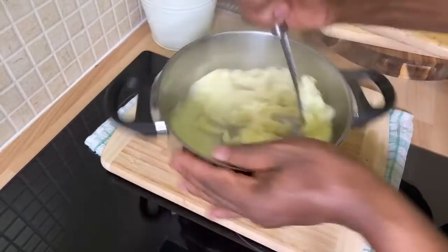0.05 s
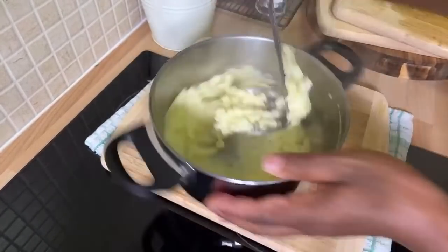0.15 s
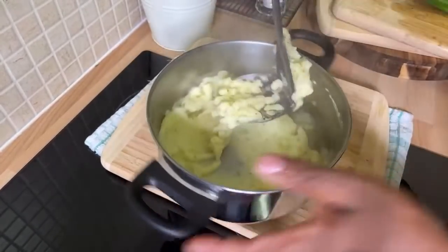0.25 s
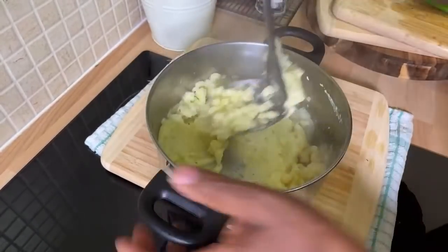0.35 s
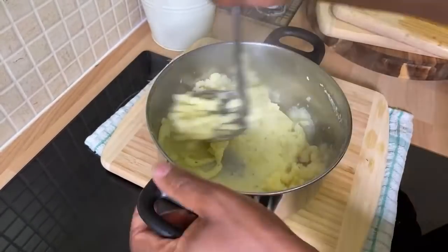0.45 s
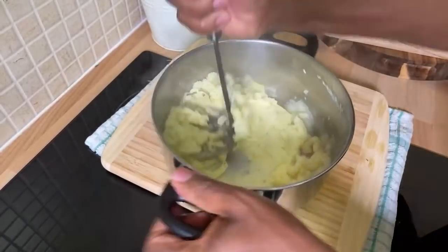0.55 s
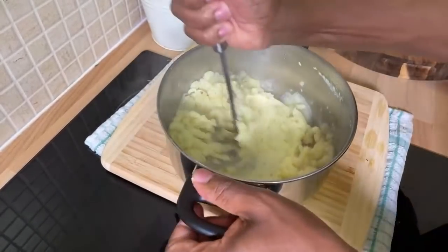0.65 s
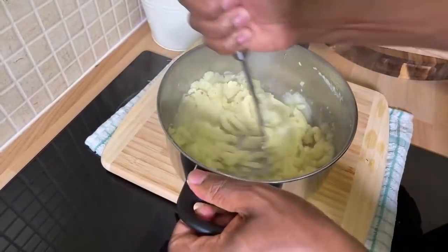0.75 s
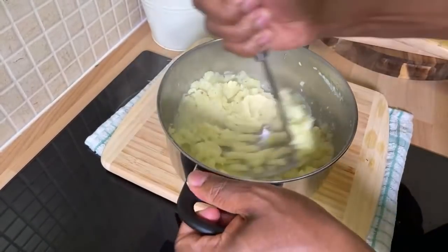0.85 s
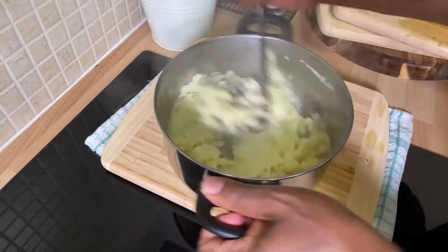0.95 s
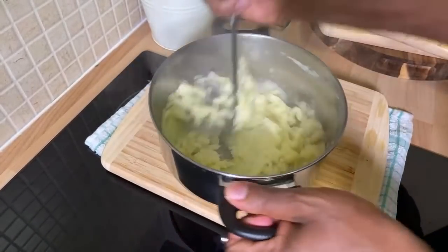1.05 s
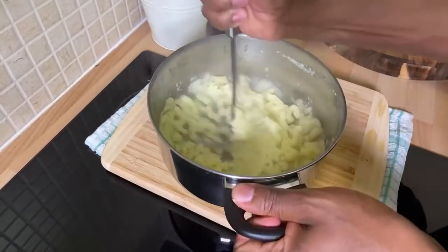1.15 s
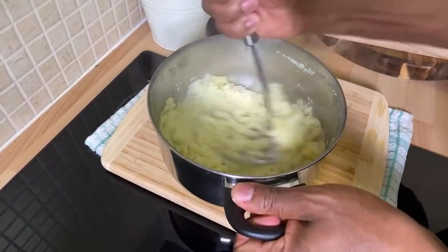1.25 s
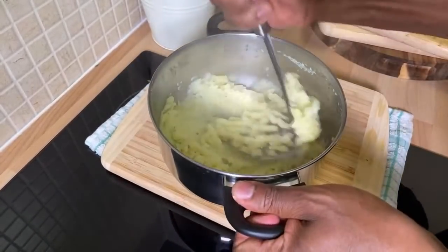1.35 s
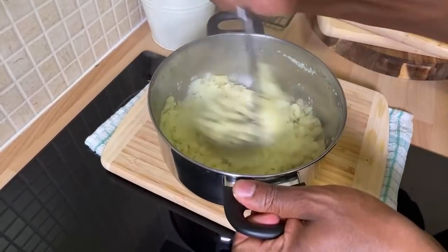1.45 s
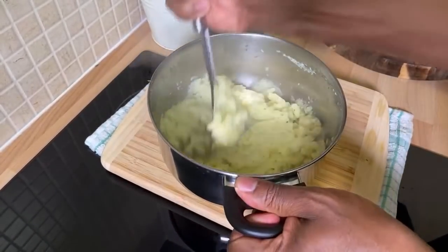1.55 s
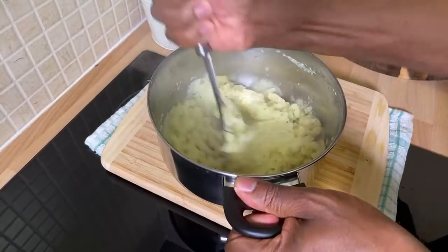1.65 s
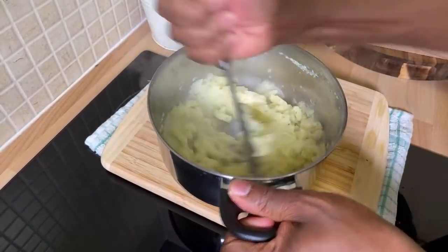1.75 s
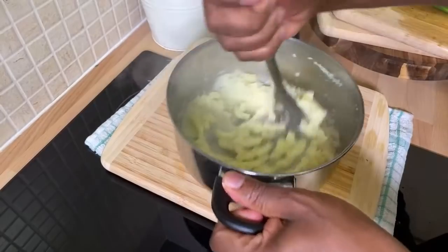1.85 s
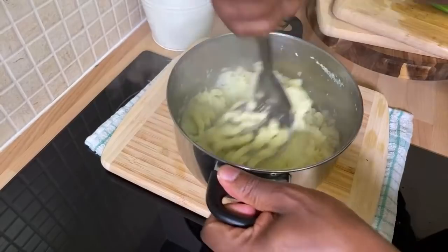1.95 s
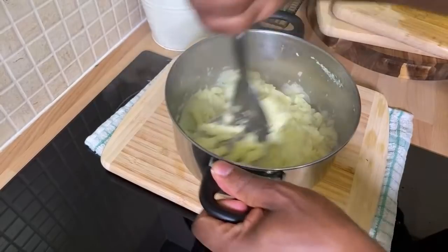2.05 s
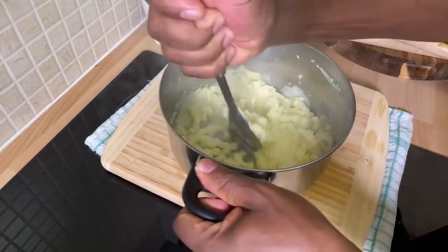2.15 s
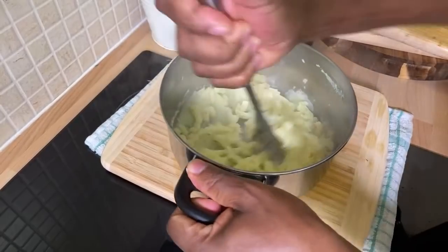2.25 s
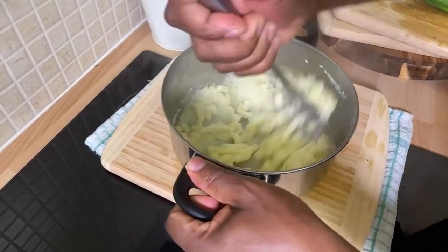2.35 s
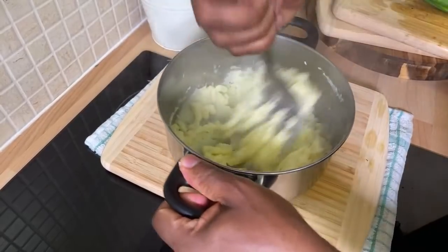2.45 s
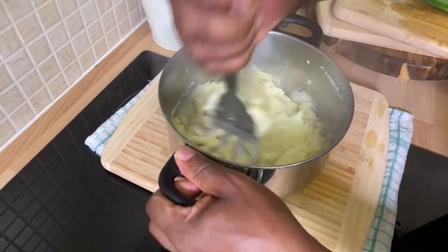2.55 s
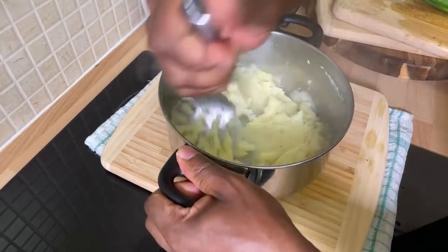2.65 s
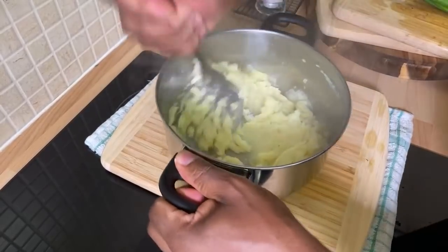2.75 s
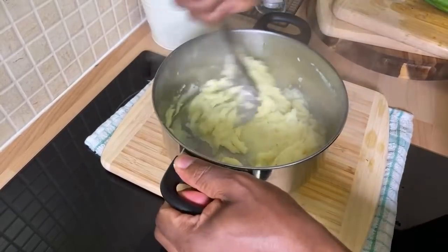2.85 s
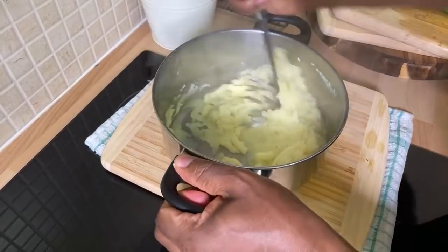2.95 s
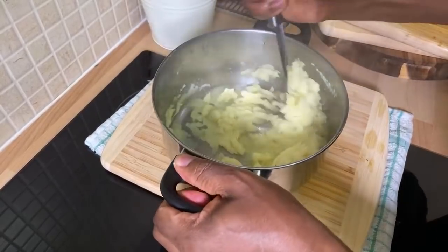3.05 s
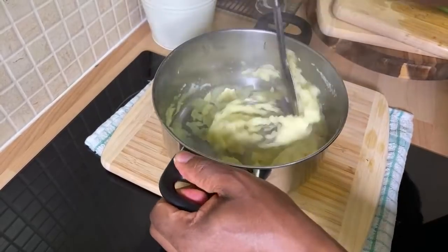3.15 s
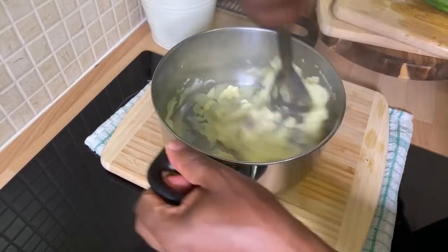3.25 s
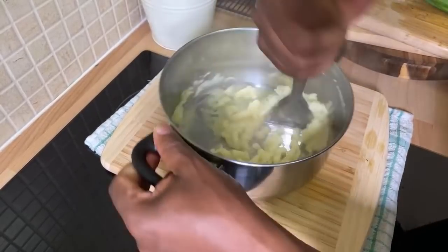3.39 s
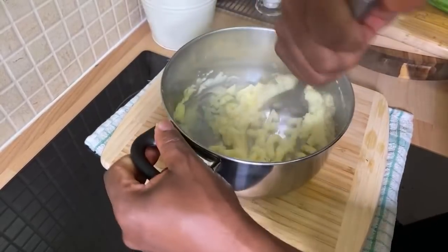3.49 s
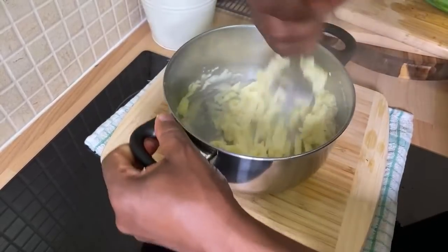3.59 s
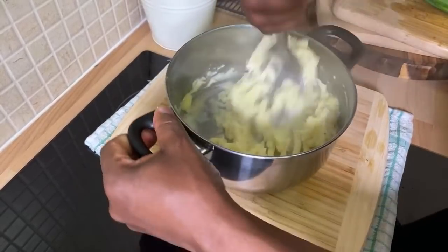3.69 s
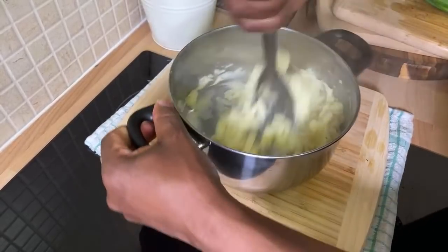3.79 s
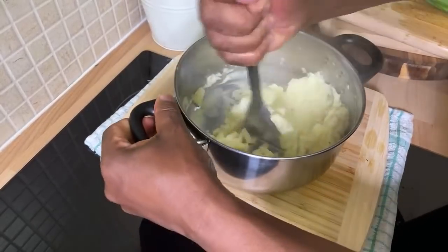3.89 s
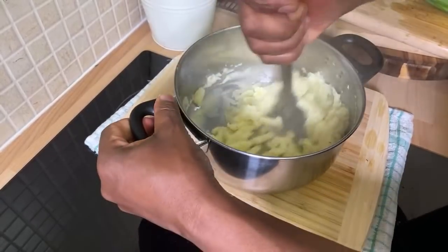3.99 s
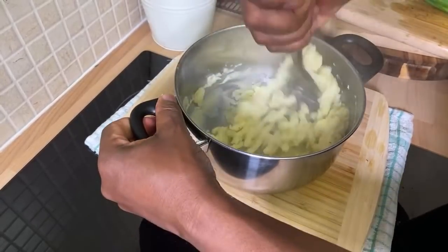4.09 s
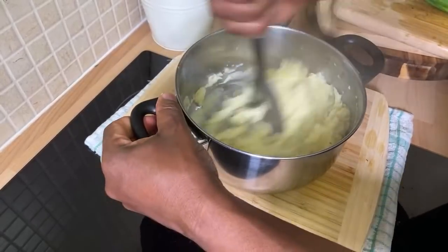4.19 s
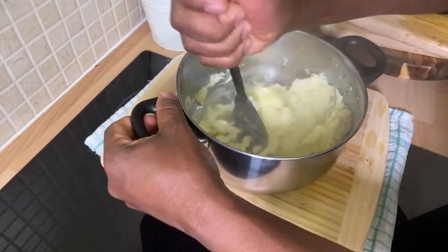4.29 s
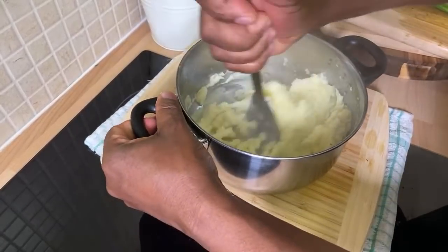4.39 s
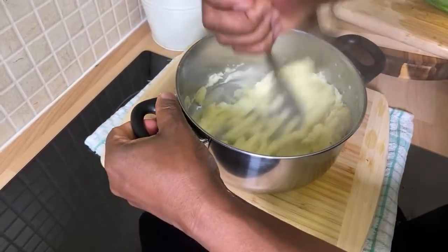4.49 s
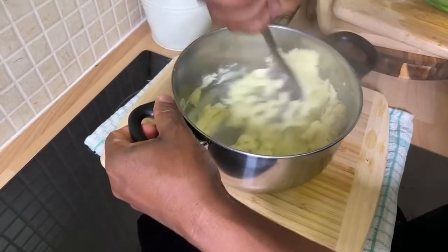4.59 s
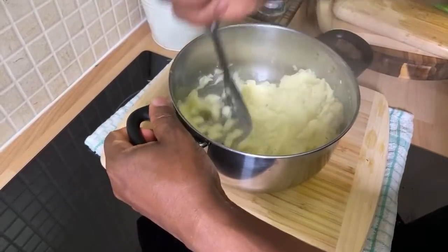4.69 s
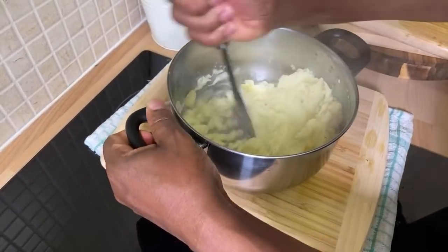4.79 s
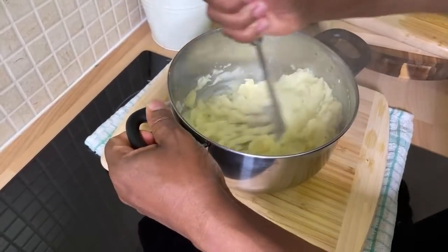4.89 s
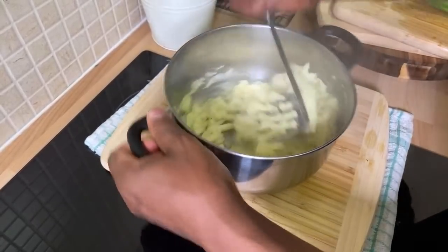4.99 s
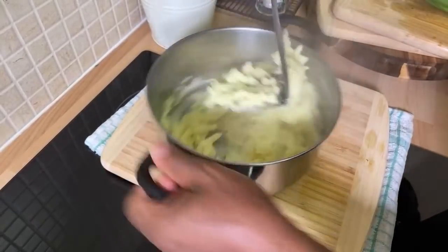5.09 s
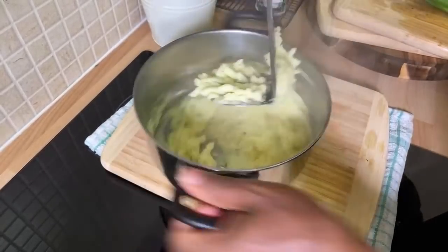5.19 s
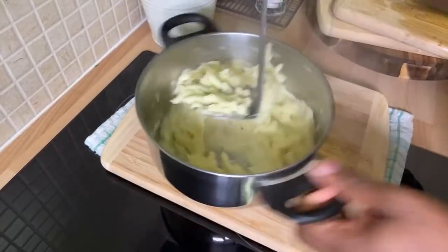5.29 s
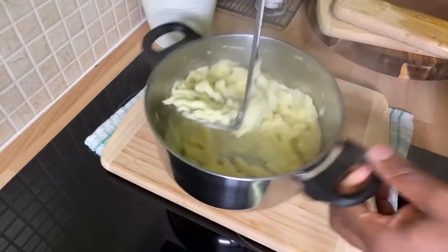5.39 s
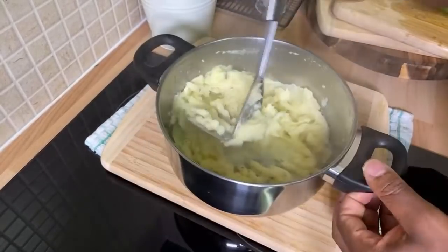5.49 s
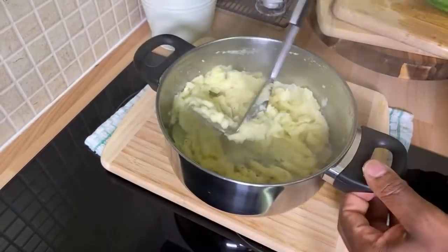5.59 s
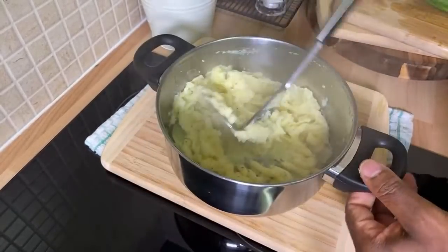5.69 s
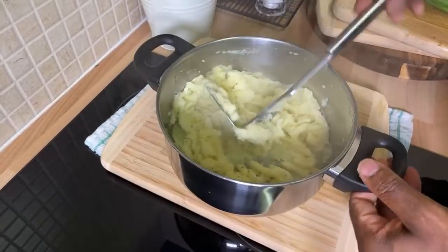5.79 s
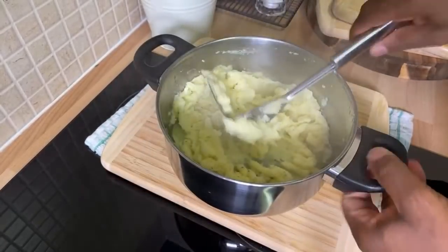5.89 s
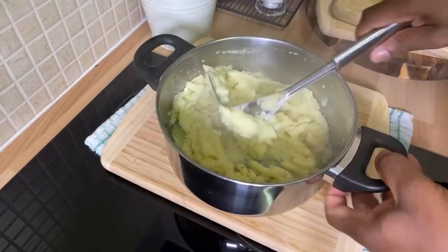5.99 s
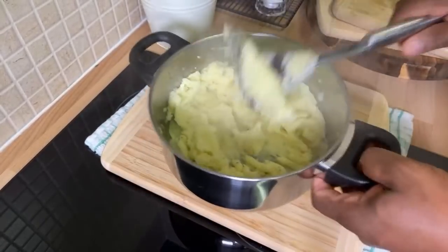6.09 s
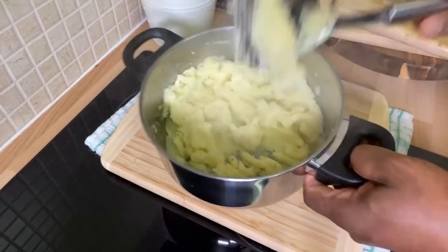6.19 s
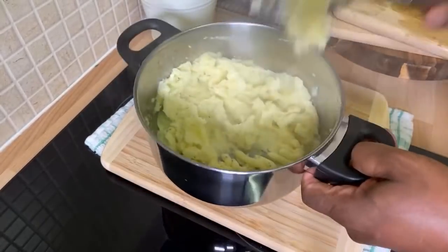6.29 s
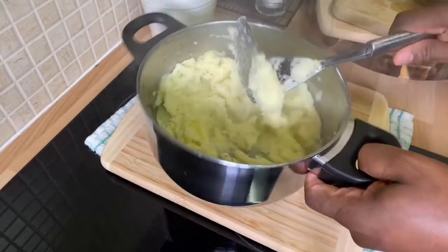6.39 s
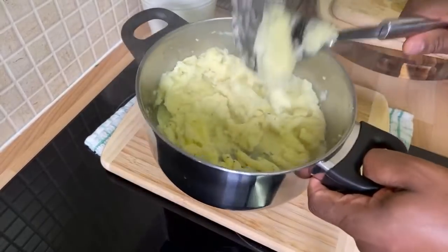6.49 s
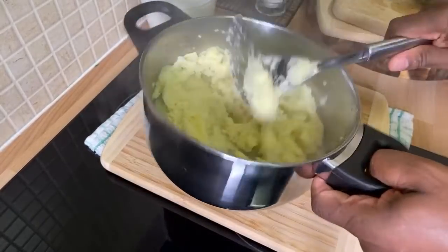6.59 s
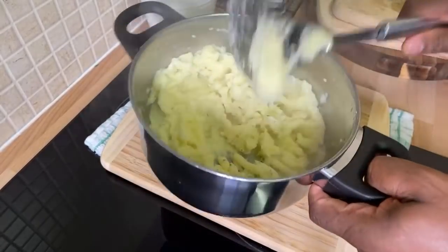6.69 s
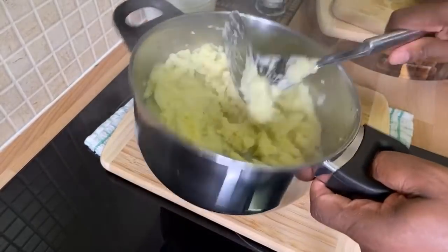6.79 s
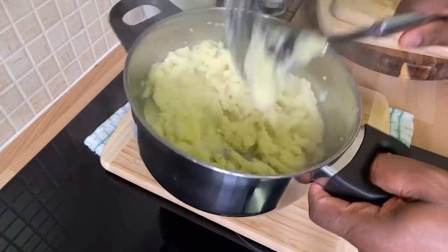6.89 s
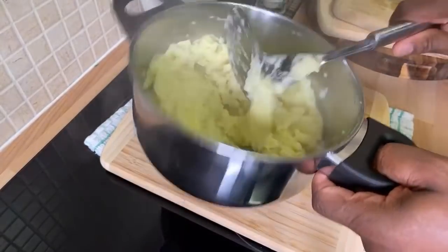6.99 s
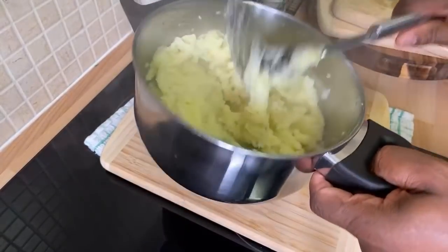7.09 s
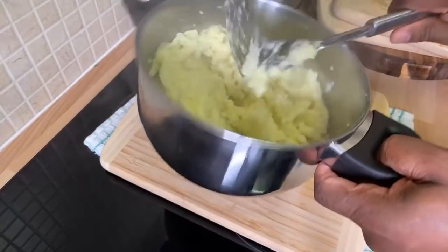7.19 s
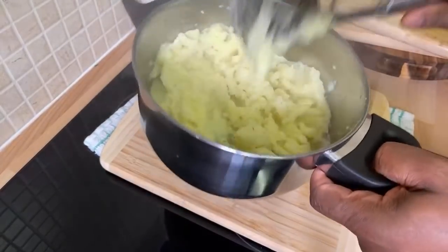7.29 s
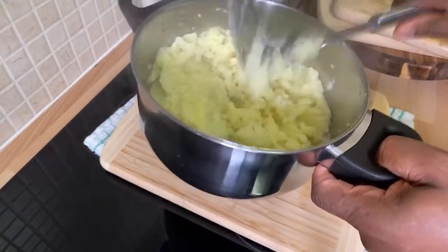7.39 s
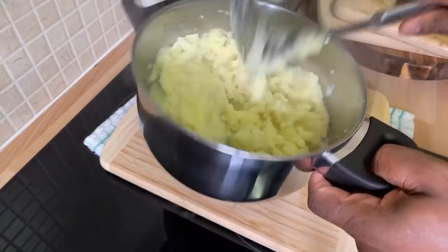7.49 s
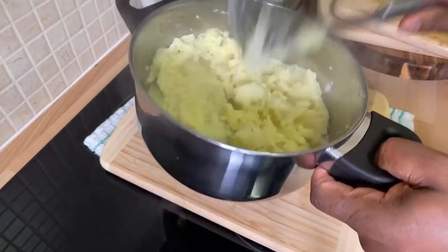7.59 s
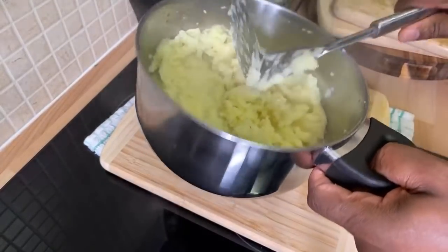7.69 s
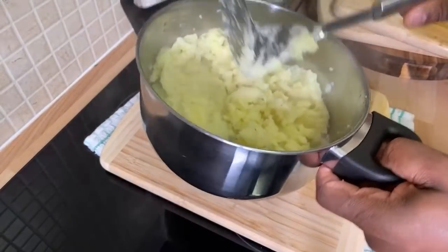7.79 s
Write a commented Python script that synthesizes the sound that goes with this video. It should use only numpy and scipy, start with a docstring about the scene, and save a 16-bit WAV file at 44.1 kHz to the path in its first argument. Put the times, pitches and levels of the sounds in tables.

```python
"""A metal masher knocks on the bottom of a steel pot of boiled potato that stands on a wooden board,
then falls against the rim and is rapped on it. Each blow excites damped modes of pot and masher, a
filtered noise crack and a worktop boom. In between, random grains make the mash hiss, the pot rub and
the worktop rumble; the pot bumps, small bright rattles tick and faint tones squeak. Decaying noise
gives the reflections of a small tiled kitchen; coloured noise is the still air."""
import sys
import numpy as np
from scipy import signal
from scipy.io import wavfile

SR = 44100
rng = np.random.default_rng(int(sys.argv[2]) if len(sys.argv) > 2 else 0)


def wav_record(signal):
    """Record a signal, one row per channel, as 16-bit PCM in the file named by sys.argv[1]."""
    frames = np.transpose(np.atleast_2d(signal))
    bounded = np.clip(frames, -1, 1)
    # unit amplitude maps onto the largest positive 16-bit level
    quanta = np.round(bounded * 32767).astype(np.int16)
    wavfile.write(sys.argv[1], SR, quanta)


N = 346185
TIME = np.arange(N) / SR   # [s]
EDGES = 40 * 2 ** np.arange(0, 9, 1 / 3)   # third-octave band edges [Hz]
CENTRES = np.sqrt(EDGES[1:] * EDGES[:-1])


def from_db(db):
    """Decibel law: the amplitude gain of a level."""
    return 10 ** (np.asarray(db) / 20)


def rms_one(x):
    """Normalisation of mean power: the signal scaled to rms 1."""
    return x / np.sqrt(np.mean(x ** 2) + 1e-20)


def at_hz(points, hz):
    """Logarithmic frequency scale: a table interpolated at a frequency."""
    points = np.array(points)
    return np.interp(np.log(hz), np.log(points[:, 0]), points[:, 1])


def butter(x, hz, kind, order=2):
    """Maximally flat filtering: a Butterworth low, high or band pass."""
    sos = signal.butter(order, hz, kind, fs=SR, output="sos")
    return signal.sosfilt(sos, x + 1e-18)


def coloured(x, spectrum):
    """Spectral shaping: third-octave bands, each with the gain of the spectrum at its centre."""
    out = 0
    for k, hz in enumerate(CENTRES):
        band = butter(x, EDGES[k:k + 2], "band", order=1)
        out = out + from_db(at_hz(spectrum, hz)) * band
    return out


def drift(rate_hz):
    """Low-pass random process: slow noise of rms 1, computed at every 40th sample."""
    r = np.exp(-2 * np.pi * rate_hz * 40 / SR)
    settle = 2000
    noise = rng.standard_normal(N // 40 + 2 + settle)
    slow = signal.lfilter([1], [1, -2 * r, r * r], noise)[settle:]
    return np.interp(np.arange(N) / 40, np.arange(len(slow)), rms_one(slow))


def ring(force, modes, column=2):
    """Modal superposition: damped resonators driven by one force, each at its level in the column."""
    out = 0
    for k, mode in enumerate(modes):
        hz, t60_s = mode[:2]
        r = from_db(-60 / (t60_s * SR))
        w = 2 * np.pi * hz / SR
        resonance = signal.lfilter([0, np.sin(w)], [1, -2 * r * np.cos(w), r * r], force + 1e-18)
        out = out + (-1) ** k * from_db(mode[column]) * resonance   # neighbours in opposite sign
    return out


def pushes(rows, axis, lag_s):
    """Impulse excitation: one click for each row, a little after first touch."""
    out = np.zeros(N)
    rows = np.array(rows)
    at = np.round((rows[:, 0] + lag_s) * SR).astype(int)
    out[at] = from_db(rows[:, axis])
    return out


SPLINTER = 0.28   # exponent by which a few sharp contacts stand out of a rattle


def contacts(rows, axis, rise_s, fall_s):
    """Repeated micro-impacts: each row is a short noise rattle of unit energy times its level."""
    t = np.arange(int(.05 * SR)) / SR
    shape = (1 - np.exp(-t / rise_s)) ** 2 * np.exp(-t / fall_s)
    out = np.zeros(N + len(t))
    for row in rows:
        noise = rng.standard_normal(len(t))
        rattle = shape * noise * np.abs(noise) ** SPLINTER
        at = round((row[0] - rise_s) * SR)
        out[at:at + len(t)] += from_db(row[axis]) * rattle / np.sqrt(np.sum(rattle ** 2))
    return out[:N]


def grains(per_s, spread_db):
    """Poisson process: random clicks of uneven size and either sign."""
    sizes = from_db(spread_db * np.minimum(rng.exponential(1, N), 5))
    signs = rng.choice([-1, 1], N)
    return sizes * signs * (rng.random(N) < per_s / SR)


# spectrum of the still air: (frequency [Hz], relative level per Hz [dB])
AIR = [(24, -36), (40, 11), (115, 12.5), (204, -19.5), (256, 3.5), (646, -17), (1020, -15), (2210, -18.5),
       (14800, -21.5), (16000, -36)]
AIR_DB = -58   # rms level


def still_air():
    """Stationary broadband noise: white noise coloured to a steady spectrum."""
    return from_db(AIR_DB) * rms_one(coloured(rng.standard_normal(N), AIR))


# reverberation of the kitchen: (frequency [Hz], decay time t60 [s])
KITCHEN = [(100, 0.78), (300, 0.18), (800, 0.23), (2000, 0.24), (5000, 0.24), (12000, 0.24)]
MOVED = 0.32   # share of reflected energy that is new at each blow, as pot and arms move


def kitchen(x):
    """Diffuse reverberation: dense reflections off tiles and cupboards die away band by band."""
    t = np.arange(int(.6 * SR)) / SR
    blow_starts = sorted(round((row[0] - .01) * SR) for row in KNOCKS + RAPS + FALLS[:1])
    starts = [0, *blow_starts, N]
    white = rng.standard_normal((len(starts), 2, len(t)))
    white = np.sqrt(1 - MOVED) * white[0] + np.sqrt(MOVED) * white[1:]
    echo = 0
    for k, hz in enumerate(CENTRES):
        band = butter(white[:, k % 2], EDGES[k:k + 2], "band")   # neighbouring bands differ in noise
        echo = echo + band * from_db(-60 * t / at_hz(KITCHEN, hz))
    echo = echo * (1 - np.exp(-t / 0.0023))   # reflections build up
    out = np.zeros(N + len(t))
    for start, end, answer in zip(starts, starts[1:], echo):
        answer = answer / np.sqrt(np.sum(answer ** 2))
        out[start:end + len(t) - 1] += signal.fftconvolve(x[start:end], answer)
    return out[:N]


# faint squeaks: (time [s], frequency [Hz], level [dB])
SQUEAKS = [(.372, 2480, -59), (4.9, 2110, -58), (6.21, 2420, -69)]


def squeaks():
    """Pure tones: short sines under a smooth, flat-topped envelope."""
    out = np.zeros(N)
    for s, hz, db in SQUEAKS:
        envelope = np.exp(-((TIME - s) / 0.018) ** 4)
        out += from_db(db) * envelope * np.sin(2 * np.pi * hz * TIME)
    return out


# modes of worktop and board: (frequency [Hz], decay time t60 [s],
# relative level with the pot standing [dB], relative level with it tilted [dB])
WORKTOP_MODES = [(66.5, 1, -3, -37), (86.3, 0.24, -2.5, -26.5), (116.9, 0.19, 3, 3.5),
                 (167.4, 0.2, -6.5, 5), (196.4, 0.075, 0, 1.5), (252, 0.13, -9.5, -5)]
STANDING, TILTED = 2, 3   # columns


def thumps(rows, pose, level_db):
    """Structure-borne sound: the push goes through the board and sets the worktop booming."""
    push = butter(pushes(rows, axis=2, lag_s=0.00734), 600, "low")
    return from_db(level_db) * ring(push, WORKTOP_MODES, pose)


# the masher is pulled out of the mash and the pot shifts: (release time [s], swell time [s],
# hiss level [dB], pot rubbing level [dB], worktop rumble level [dB])
PULLS = [(0.22, 0.19, -59.5, -57.5, -49), (0.80, 0.038, -56, -54, -57), (1.27, 0.027, -54.5, -76, -45),
         (1.86, 0.12, -60.5, -58, -61), (2.328, 0.075, -53.5, -54, -70), (3.09, 0.12, -59, -78, -66),
         (3.589, 0.055, -55.5, -56, -57), (4.04, 0.054, -55.5, -46.5, -57),
         (4.475, 0.031, -50.5, -52.5, -46), (4.91, 0.045, -54, -54, -66), (5.98, 0.015, -56.5, -55.5, -63)]
SWELL_DB = 8.5   # rise over the swell time, and fall over each fall time below
HISS_FALL_S, RUB_FALL_S, RUMBLE_FALL_S = 0.036, 0.048, 0.046
RUB_LEAD_S, RUMBLE_LEAD_S = 0.037, 0.004   # the pot moves before the mash lets go
# the masher or the pot is dragged along: (start time [s], length [s],
# hiss level [dB], pot rubbing level [dB], worktop rumble level [dB], fade over the length [dB])
DRAGS = [(2.615, 0.32, -47, -49, -64, 10.5), (2.759, .07, -53.5, -49, -39, 0),
         (4.98, 0.435, -62, -62, -59, -1.5)]
DRAG_EDGE_S = 0.027
# mash gives way under each knock: (hiss, rubbing, rumble), relative to the knock's pot level [dB]
SQUEEZE_DB = (-20.5, -22, -31)
# decay of that squeeze: (hiss, rubbing, rumble), decay time t60 [s]
SQUEEZE_T60_S = (0.41, 0.14, 0.65)
# steady hand pressure: (hiss, rubbing, rumble), level [dB]
PRESSURE_DB = (-73.5, -69.5, -58)
LIFTED_S, LIFT_T60_S = 6.05, 0.28   # the pressure ends at this time, with this decay time


def effort(axis, lead_s, fall_s):
    """Addition of powers: hand pressure, squeezes after knocks, pulls and drags set one layer's gain."""
    lifted_s = np.maximum(TIME - LIFTED_S, 0)
    power = from_db(PRESSURE_DB[axis] - 60 * lifted_s / LIFT_T60_S) ** 2
    for s, body_db, *_ in KNOCKS:
        squeeze_db = body_db + SQUEEZE_DB[axis] - 60 * np.abs(TIME - s) / SQUEEZE_T60_S[axis]
        power += (TIME > s) * from_db(squeeze_db) ** 2
    for s, swell_s, *db in PULLS:
        late = TIME - s + lead_s
        power += from_db(db[axis] - SWELL_DB * np.maximum(-late / swell_s, late / fall_s)) ** 2
    for s, length_s, *db in DRAGS:
        to_edge_s = np.minimum(TIME - s, s + length_s - TIME)
        inside = np.clip(to_edge_s / DRAG_EDGE_S + .5, 0, 1)
        fade_db = db[-1] * np.clip((TIME - s) / length_s, 0, 1)
        power += inside * from_db(db[axis] - fade_db) ** 2
    return np.sqrt(power)


# spectrum of the mash hiss: (frequency [Hz], relative level per Hz [dB])
HISS = [(710, -2.5), (1200, 12), (1470, 7.5), (2860, 2.5), (8260, -2.5), (10300, -7), (14500, -5),
        (16000, -17)]


def stirring():
    """Stick-slip and granular excitation: slips ring worktop and pot; mash hisses in grains and pops."""
    rumble = rms_one(ring(grains(per_s=130, spread_db=5.0), WORKTOP_MODES, STANDING))
    slips = grains(per_s=250, spread_db=2.5)
    pot_ring = ring(butter(slips, 1270, "low"), POT_MODES, BOARD)
    scrape = butter(slips, [250, 2500], "band", order=1)
    rub = rms_one(pot_ring + from_db(20.5) * scrape)
    wet_grains = grains(per_s=6000, spread_db=0.5)
    pops = grains(per_s=60, spread_db=-1.0)
    hiss = rms_one(coloured(wet_grains + from_db(10.5) * pops, HISS))
    hiss = hiss * from_db(2.43 * drift(21))   # both levels flicker
    rub = rub * from_db(1.45 * drift(36))
    return (effort(axis=0, lead_s=0, fall_s=HISS_FALL_S) * hiss
            + effort(axis=1, lead_s=RUB_LEAD_S, fall_s=RUB_FALL_S) * rub
            + effort(axis=2, lead_s=RUMBLE_LEAD_S, fall_s=RUMBLE_FALL_S) * rumble)


# small bright ticks, which are grazes of metal, wet pops in the mash and a clack of the fall:
# (time [s], level before the band filter [dB], frequency [Hz])
TICKS = [(0.035, -11, 1810), (0.431, -11, 4050), (0.908, -24.5, 3960), (2.321, -22.5, 9100),
         (2.506, -33, 6300), (2.777, -34, 5200), (2.824, -36, 4200), (2.93, -30, 3600), (5.635, -34, 7940),
         (5.853, -12, 4270), (5.978, -43, 4000)]
TICK_WIDTH = 1.33   # band edges lie this factor above and below


def ticks():
    """Band-limited micro-impacts: each tick is a small rattle in a band of its own."""
    out = 0
    for row in TICKS:
        rattle = contacts([row], axis=1, rise_s=0.00117, fall_s=0.0074)
        out = out + butter(rattle, [row[2] / TICK_WIDTH, row[2] * TICK_WIDTH], "band")
    return out


# the pot rocks and bumps on the board: (time [s], relative pot body level [dB],
# relative worktop thump level [dB], thud frequency [Hz])
BUMPS = [(0.035, -18.5, -46, 752), (0.825, -40.5, -52, 670), (0.911, -38.5, -44, 655),
         (1.234, -39, -50, 585), (1.882, -29, -45, 770), (2.749, -32.5, -60, 665), (2.806, -51, -42.5, 600),
         (2.869, -39, -69, 740), (3.068, -30.5, -43, 740), (3.941, -42, -54, 654), (4.345, -30, -43, 620),
         (4.397, -33, -39, 640), (4.503, -45, -60, 660), (4.858, -41.5, -55, 900), (5.054, -37.5, -41, 533),
         (5.984, -40.5, -38.5, 540), (6.054, -45, -67, 546)]
THUD_WIDTH = 1.13   # band edges lie this factor above and below


def bumps():
    """Soft contact: a low-passed push reaches mainly the low modes and gives a compact thud."""
    push = butter(pushes(BUMPS, axis=1, lag_s=0.000081), 810, "low", order=4)
    thud = 0
    for row in BUMPS:
        click = pushes([row], axis=1, lag_s=0.0014)
        thud = thud + butter(click, [row[3] / THUD_WIDTH, row[3] * THUD_WIDTH], "band")
    pot_ring = from_db(-10.5) * ring(push, POT_MODES, BOARD)
    return pot_ring + from_db(34.5) * thud + thumps(BUMPS, STANDING, level_db=-3.5)


def favour(force, rows, axis, boost_db, width):
    """Position-dependent excitation: each blow feeds the modes near its own pitch more strongly."""
    out = force.copy()
    for row in rows:
        near = slice(round((row[0] - .005) * SR), round((row[0] + .015) * SR))
        band_hz = [row[axis] / width, row[axis] * width]
        out[..., near] += from_db(boost_db) * butter(force[..., near], band_hz, "band", order=1)
    return out


DEEP_HZ, UPPER_HZ = 503, 917   # where the pot's ranges meet


def weigh(force, rows):
    """Modal participation: the spot struck sets how much the deep and the upper pot modes get."""
    rows = np.array(rows)
    current = np.searchsorted(rows[1:, 0] - .005, TIME)   # the blow that each sample belongs to
    deep, upper = from_db(rows[current, 7:9].T)
    low = butter(force * deep, DEEP_HZ, "low")
    middle = butter(force, [DEEP_HZ, UPPER_HZ], "band")
    high = butter(force * upper, UPPER_HZ, "high")
    return low - middle + high   # the opposite sign aligns the phases where the ranges meet


# modes of the pot with mash: (frequency [Hz], decay time t60 [s], relative level struck on the bottom [dB],
# relative level struck on the rim [dB], relative level bumped on the board [dB])
POT_MODES = [(329, 0.048, 1, -11.5, -5), (409, 0.069, -1.5, -1, -2.5), (485.4, 0.11, -4.5, -11, -3),
             (562, 0.047, -6.5, -2.5, -1.5), (596, 0.14, -6.5, -42, -8), (649.3, 0.065, -0.5, -8, 4.5),
             (756, 0.067, -6.5, 0.5, 2), (775.4, 0.065, -3.5, 1, -0.5), (883, 0.076, -4.5, -4.5, -2),
             (953.5, 0.1, -4.5, -2, -8.5), (1062, 0.15, -4.5, -10, -11), (1126.4, 0.14, -8, -3.5, -3.5),
             (1195, 0.15, -3, -2, -14), (1275, 0.1, -7.5, 4, -0.5), (1378, 0.25, -13.5, -10, -26)]
BOTTOM, RIM, BOARD = 2, 3, 4   # columns
# modes of masher plate and shaft and pot wall: (frequency [Hz], decay time t60 [s],
# relative level knocked [dB], relative level rapped [dB], relative level fallen [dB])
MASHER_MODES = [(1740, 0.0108, -12, -26.5, -2), (1867, 0.042, -13.5, -10.5, -7),
                (2270, 0.0053, -19, 0.5, -15), (2803, 0.03, -28, -11.5, -35), (2875, 0.036, -28, -16, -30),
                (4070, 0.0043, -12, -9.5, 1), (4230, 0.018, -15, -25, -3.5), (4580, 0.0036, -0.5, -4, 0.5),
                (8190, 0.022, -13, -5.5, -8), (8644, 0.02, -14, -1, -3.5)]
KNOCKED, RAPPED, FALLEN = 2, 3, 4   # columns


def blows(rows, spot, way, crack, rise_s, fall_s, body_db, metal_db, crack_db, boost_db):
    """Impact excitation: pot and masher ring, and a broad crack is a rattle heard straight
    and a click sent to the tiles; returns body, metal, rattle and click."""
    def at_spot(force):
        return favour(weigh(force, rows), rows, axis=5, boost_db=boost_db, width=1.07)

    rattle = [contacts(rows, axis=k, rise_s=rise_s, fall_s=fall_s) for k in (1, 3, 4)]
    click = [pushes(rows, axis=k, lag_s=.001) for k in (1, 3, 4)]
    # each range holds two signals: [0] rattle, [1] click
    low, clank, treble = np.transpose([rattle, click], (1, 0, 2))

    # the random rattle makes no two blows weigh the modes alike
    uneven = pushes(rows, axis=1, lag_s=0.002014) + from_db(-5.0) * low[0]
    body = from_db(body_db) * ring(at_spot(butter(uneven, 1190, "low")), POT_MODES, spot)

    # harder contact feeds the upper ranges
    bright = butter(clank, [1500, 5000], "band", order=1) + butter(treble, 6000, "high", order=1)
    bright = favour(bright, rows, axis=6, boost_db=0.5, width=1.1)
    metal = from_db(metal_db) * ring(bright[1] + from_db(-10.5) * bright[0], MASHER_MODES, way)

    dull = from_db(-12.0) * at_spot(butter(low, 1300, "low", order=1))
    broad_rattle, broad_click = from_db(crack_db) * coloured(dull + bright, crack)
    return np.array([body, metal, broad_rattle, broad_click])


# the masher is let go and falls against the rim: (time [s], relative pot body level [dB],
# relative worktop thump level [dB], relative clank level [dB], relative treble level [dB],
# favoured body pitch [Hz], favoured clank pitch [Hz],
# deep pot modes over the middle ones [dB], upper pot modes over the middle ones [dB])
FALLS = [(5.714, -55, -65, -49.5, -72, 1900, 4500, 3, 0.5),
         (5.733, -12, -33.5, -23, -25, 1080, 1680, 9.5, 0.5),
         (5.852, -23, -43.5, -33, -41, 734, 2220, 6, 2.3)]
# colour of their crack: (frequency [Hz], relative level [dB])
FALL_CRACK = [(250, -5.5), (450, 5), (1000, -3), (1600, 18), (2300, -24), (3000, -18), (4200, -16),
              (6000, -3.5), (8500, 11.5), (11000, -41), (16500, 7)]


def falls():
    """Free impact: the falling masher excites the rim modes."""
    return blows(FALLS, RIM, FALLEN, FALL_CRACK, rise_s=0.001082, fall_s=0.0072,
                 body_db=-18.5, metal_db=2.0, crack_db=20, boost_db=7.5)


# masher shaft on the rim: (time [s], relative pot body level [dB],
# relative worktop thump level [dB], relative clank level [dB], relative treble level [dB],
# favoured body pitch [Hz], favoured clank pitch [Hz],
# deep pot modes over the middle ones [dB], upper pot modes over the middle ones [dB])
RAPS = [(6.348, -8.5, -31, -14, -12.5, 666, 6600, 5.5, -1.4),
        (6.553, -10.5, -34, -26, -11.5, 1270, 5300, 1, -0.33),
        (6.755, -11.5, -34.5, -26, -11.5, 1270, 5170, 4.5, 0.5),
        (6.966, -11.5, -36, -24.5, -11.5, 393, 2700, 3.5, 1.4),
        (7.163, -10, -35, -19, -12.5, 390, 2740, 3, 0.5),
        (7.38, -11, -33.5, -17, -9.5, 400, 2770, 4.5, 0.72),
        (7.597, -10, -34.5, -16.5, -10, 405, 2830, 1, -0.58)]
# colour of their crack: (frequency [Hz], relative level [dB])
RAP_CRACK = [(250, -41), (450, 1), (1200, 14.5), (1700, -28.5), (2700, -14), (3300, -0.5), (5000, -10),
             (7000, 7), (8500, -15), (10000, -11), (14500, -27), (16500, -18)]


def raps():
    """Hard impact at an edge: the shaft, rapped to shake the mash off, excites the rim modes."""
    return blows(RAPS, RIM, RAPPED, RAP_CRACK, rise_s=0.001802, fall_s=0.0047,
                 body_db=-10.5, metal_db=-1.0, crack_db=19.5, boost_db=-5.5)


# masher on the pot bottom: (time [s], relative pot body level [dB],
# relative worktop thump level [dB], relative clank level [dB], relative treble level [dB],
# favoured body pitch [Hz], favoured clank pitch [Hz],
# deep pot modes over the middle ones [dB], upper pot modes over the middle ones [dB])
KNOCKS = [(0.474, -14.5, -30, -30.5, -22, 860, 4150, 2, 0.5),
          (1.004, -16.5, -35.5, -30, -26.5, 672, 5030, 4.5, 4),
          (1.49, -18.5, -30.5, -28.5, -32, 590, 6700, 2.5, 2),
          (2.021, -13.5, -39, -27.5, -27.5, 760, 4930, -2, -3.5),
          (2.546, -18, -47, -46, -29, 1260, 4540, 5, 7), (3.268, -18, -34, -25, -24, 1040, 4730, 6, 4.5),
          (3.784, -24.5, -33, -32.5, -30.5, 394, 2020, 6, 6),
          (4.206, -16.5, -34, -33.5, -26, 656, 3560, -1.5, -1.5),
          (4.666, -18.5, -34.5, -34.5, -24.5, 690, 3500, 2.5, 1)]
# colour of their crack: (frequency [Hz], relative level [dB])
KNOCK_CRACK = [(250, 8.5), (650, 19.5), (1200, -9), (1600, 7), (2200, -2), (3300, -1.5), (4600, 7.5),
               (6500, 5), (8300, -22), (9800, -35), (14500, -4.5), (16500, -18)]


def knocks():
    """Impact on a loaded plate: the masher excites the bottom modes of the pot with mash."""
    return blows(KNOCKS, BOTTOM, KNOCKED, KNOCK_CRACK, rise_s=.0015, fall_s=0.0071,
                 body_db=-10, metal_db=8.5, crack_db=19.5, boost_db=-2.0)


def scene():
    """Superposition: direct sound and reflections of the blows, with stirring, squeaks and still air."""
    body, metal, rattle, click = knocks() + raps() + falls()
    body = body + bumps()
    metal = metal + ticks()
    booms = thumps(KNOCKS + FALLS, STANDING, level_db=0.0) + thumps(RAPS, TILTED, level_db=-2.0)
    # ring and crack each get their own random echo; the worktop boom of the blows stays dry
    ring_echoes = kitchen(from_db(-7.5) * body + from_db(1.0) * metal)
    crack_echoes = kitchen(from_db(0.17) * click)
    direct = body + metal + rattle + booms
    return (direct + ring_echoes + crack_echoes + stirring() + squeaks() + still_air())[None]


CUTOFF_HZ = 16800   # start of the stop band


def record(dry):
    """Band limitation: the microphone drops the deep bass; the top is cut."""
    x = butter(dry, 92.0, "high", order=3)
    top_cut = signal.cheby2(12, 70, CUTOFF_HZ, fs=SR, output="sos")
    return signal.sosfilt(top_cut, x)


dry = scene()
out = record(dry)
wav_record(out)
```